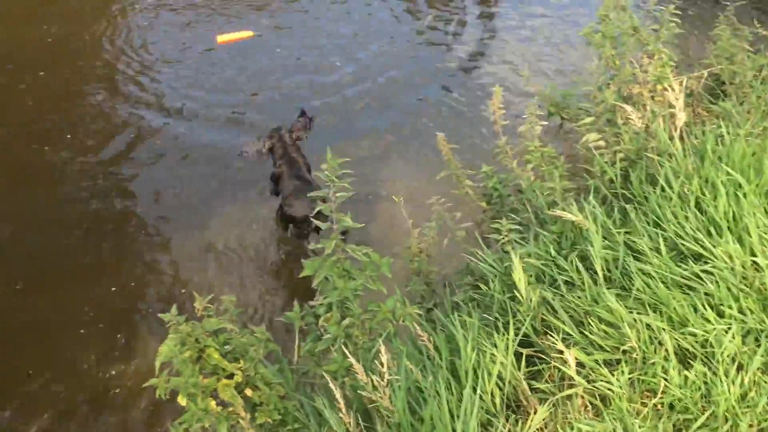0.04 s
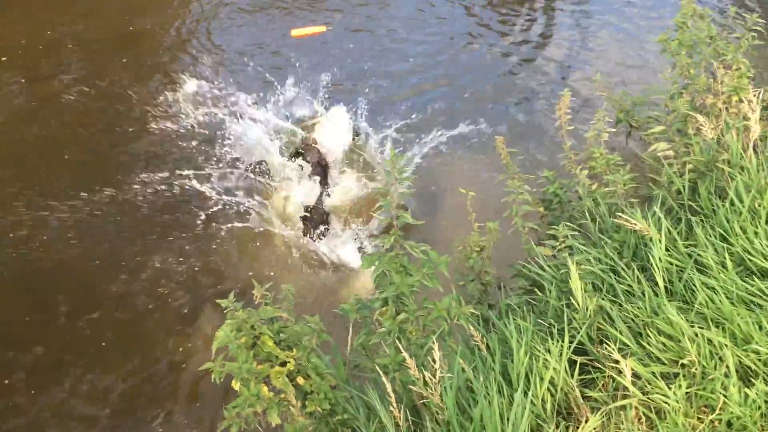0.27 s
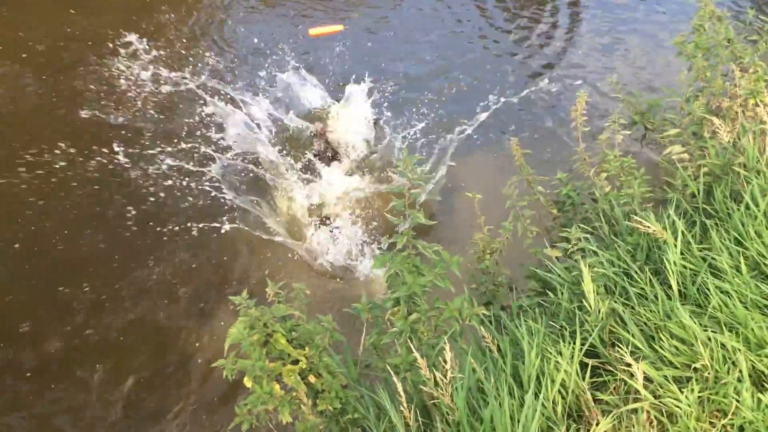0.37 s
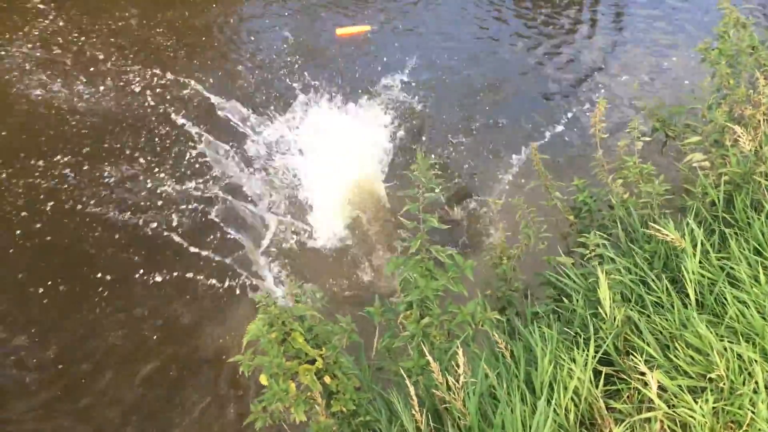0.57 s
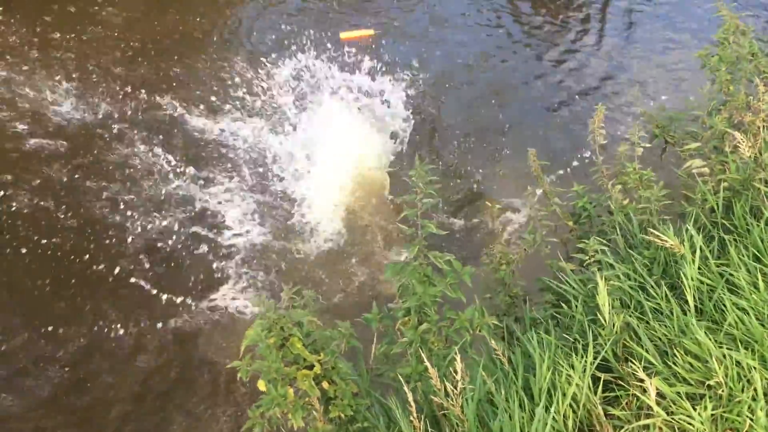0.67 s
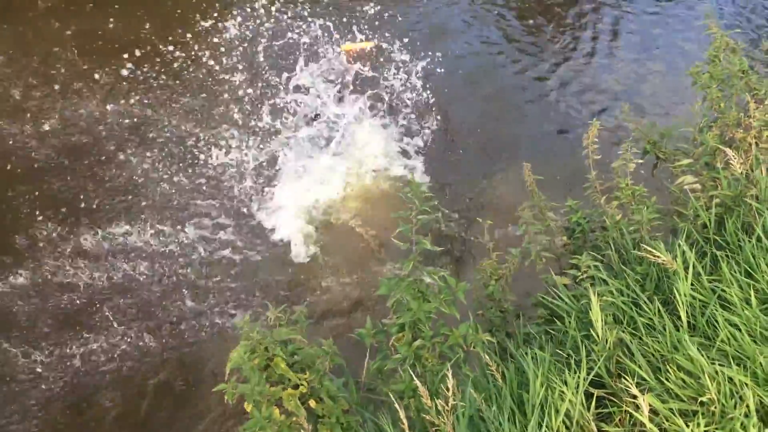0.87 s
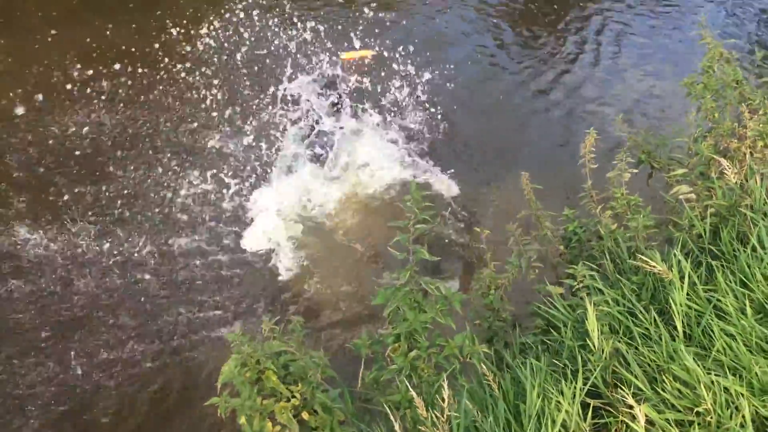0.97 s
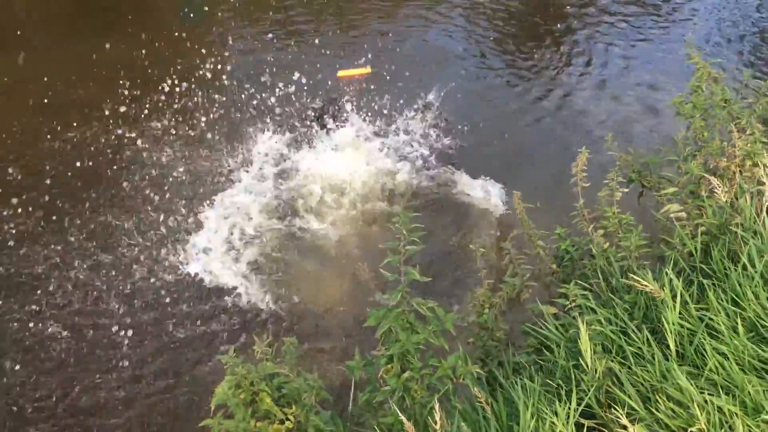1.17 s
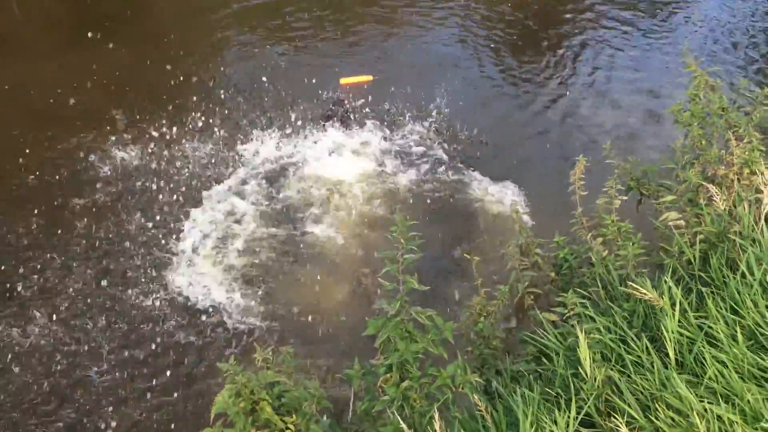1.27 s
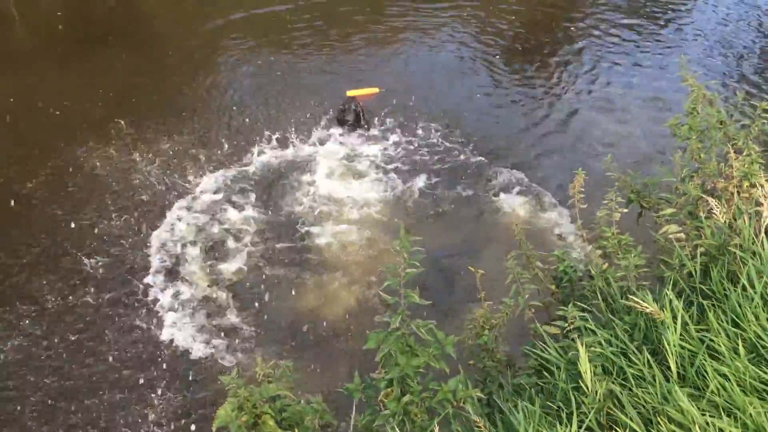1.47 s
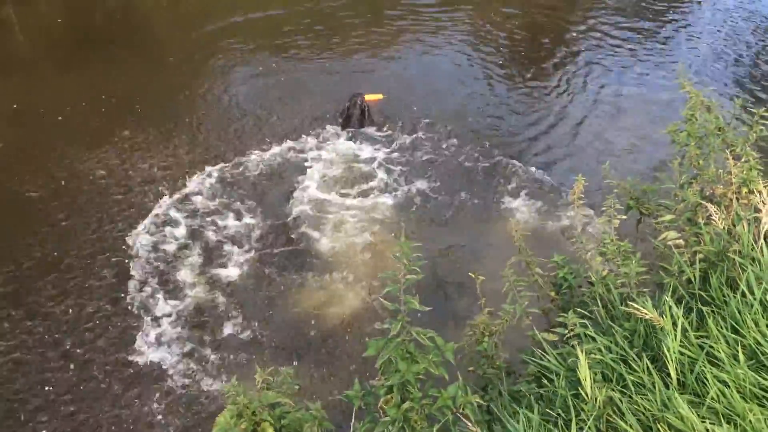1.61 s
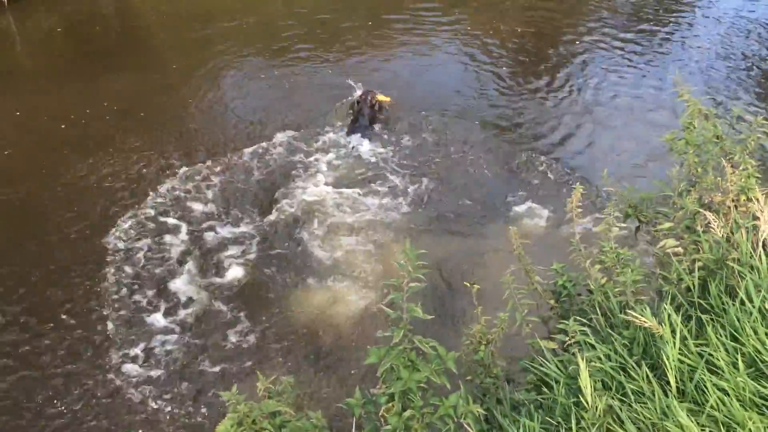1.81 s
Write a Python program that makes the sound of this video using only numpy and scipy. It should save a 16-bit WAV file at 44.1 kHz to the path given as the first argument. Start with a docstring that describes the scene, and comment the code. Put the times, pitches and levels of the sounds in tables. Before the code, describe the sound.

A dog plunges into water with a sudden splash, followed by pattering spray and drips.

```python
"""On a grassy river bank, one microphone a few metres from where a dog leaps into the water.
Paws and belly slap the surface and trap pockets of air that ring; the hollow closes with a thud and
throws up a jet. Spray rains back, the jet collapses into churning foam, and a few last fat drops land.
The banks scatter a little of the splash, and a faint outdoor hush and rumble lie under it all."""
import sys
import numpy as np
from scipy import signal
from scipy.fft import rfft, irfft
from scipy.io import wavfile

SR = 44100
rng = np.random.default_rng(int(sys.argv[2]) if len(sys.argv) > 2 else 0)


def put_to_file(sound):
    """Save the sound as 16-bit audio at rate SR, in the file named by the first command-line argument."""
    columns = np.atleast_2d(sound).T  # one column per channel
    safe = np.clip(columns, -1, 1)
    whole_steps = np.round(safe * 32767)
    wavfile.write(sys.argv[1], SR, whole_steps.astype(np.int16))


N = 81585
TIME = np.arange(N) / SR
CUTOFF_HZ = 15250
DECAYS_PER_T60 = np.log(1000)  # time constants in a fall of 60 dB


def from_db(db):
    return 10 ** (np.asarray(db) / 20)


def unit_rms(x):
    return x / np.sqrt(np.mean(x ** 2) + 1e-20)


def gain_over_time(curve):
    """Join (seconds, dB) points into a gain for every sample."""
    return from_db(np.interp(TIME, *np.transpose(curve)))


def gain_at_hz(colour, hz):
    """Read a gain from (Hz, dB) points on a log-frequency axis."""
    freqs, db = np.transpose(colour)
    return from_db(np.interp(np.log(hz), np.log(freqs), db))


def band(x, low_hz, high_hz, order=2):
    """Causal band-pass."""
    high_hz = min(high_hz, .45 * SR)
    sos = signal.butter(order, [min(low_hz, high_hz - 1), high_hz], "band", fs=SR, output="sos")
    return signal.sosfilt(sos, x + 1e-18)


def burst(start, attack_s, decay_s):
    """Quick rise and exponential fall."""
    age = np.maximum(TIME - start, 0)
    return (1 - np.exp(-age / attack_s)) * np.exp(-age / decay_s)


def noise(colour):
    """Smooth noise of a given colour, silent below its first point; rms 1."""
    hz = np.arange(1, N + 2) * SR / (2 * N)
    spectrum = rfft(rng.standard_normal(2 * N)) * gain_at_hz(colour, hz) * (hz > colour[0][0])
    return unit_rms(irfft(spectrum)[:N])


def clicks(per_s, spread_db):
    """Random clicks of uneven size, with steady mean power whatever their rate."""
    sizes = from_db(spread_db * np.minimum(rng.exponential(1, N), 4))
    signs = rng.choice([-1, 1], N)
    return sizes * signs * (rng.random(N) < per_s / SR) / np.sqrt(per_s)


def ring(x, hz, t60):
    """One bubble resonance, falling 60 dB in t60 seconds."""
    radius = from_db(-60 / (t60 * SR))
    angle = 2 * np.pi * hz / SR
    return signal.lfilter([1, 0, -1], [1, -2 * radius * np.cos(angle), radius ** 2], x + 1e-18)


def bubbles(colour, per_s, cycles, spread_db, count=28):
    """A cloud of bubbles at `count` pitches, each dying by 60 dB over `cycles` periods; rms 1."""
    low, high = colour[0][0], min(colour[-1][0], CUTOFF_HZ)
    pitches = low * (high / low) ** ((np.arange(count) + rng.random(count)) / count)
    cloud = np.zeros(N)
    for hz in pitches:
        ringing = ring(clicks(per_s / count, spread_db), hz, t60=cycles / hz)
        cloud += gain_at_hz(colour, hz) * np.sqrt(hz) * unit_rms(ringing)
    return unit_rms(band(cloud, low, high))


# A few metres out, the water is struck by paws, belly, the closing hollow and falling sheets.
# Each row: start in seconds, level in dB, decay in seconds, low and high band edges in Hz.
SLAPS = [(0.1992, -19.5, 0.0022, 1170, 2200), (0.202, -22.5, 0.0027, 1060, 7500),
         (0.2314, -17.5, 0.011, 400, 4000), (0.2348, -16, 0.0018, 900, 11200),
         (0.2463, -19.5, 0.0077, 403, 6000), (0.2525, -21.5, 0.0036, 450, 7900),
         (0.518, -33.5, 0.036, 150, 4000), (.547, -23.5, 0.022, 130, 7000), (0.936, -35, 0.025, 617, 1170),
         (1.082, -25, 0.0024, 1190, 1530), (1.107, -33.5, 0.058, 200, 1900),
         (1.2612, -26.5, 0.0034, 755, 1290)]


def slaps():
    """Each blow on the surface is a short, dense crackle."""
    out = np.zeros(N)
    for start, db, decay_s, low_hz, high_hz in SLAPS:
        envelope = burst(start, attack_s=0.00058, decay_s=decay_s)
        crackle = band(clicks(per_s=22000, spread_db=0.4), low_hz, high_hz, order=1)
        crackle = band(crackle, 0.43 * low_hz, CUTOFF_HZ, order=3)  # steep fall well below the band
        out += from_db(db) * envelope / envelope.max() * unit_rms(crackle)
    return out


# Large pockets of air under the splash.
# Each row: start in seconds, pitch in Hz, level in dB, seconds to fall 60 dB.
AIR_POCKETS = [(0.222, 426, -25.5, 0.043), (.231, 200, -16, 0.044), (0.2515, 238.5, -7, 0.066),
               (.291, 414, -26, 0.044), (0.294, 210.4, -20.5, 0.12), (.316, 570, -25, 0.029),
               (.354, 384, -24, 0.1), (.356, 220, -21.5, 0.1), (0.403, 150, -34, 0.058),
               (0.514, 139, -16.5, 0.049), (0.514, 418, -22, 0.09), (0.5441, 91, -14, 0.041),
               (.546, 290, -11.5, 0.014), (.596, 487, -28, 0.19), (.622, 398, -28.5, 0.09),
               (0.674, 385, -18, 0.037), (0.699, 333, -29, 0.082), (.745, 354, -34.5, 0.21),
               (0.791, 423, -37.5, 0.19), (.825, 358, -31, 0.066), (.917, 385, -25, 0.067),
               (.953, 363, -28.5, 0.08), (1.073, 416, -30.5, 0.076), (1.104, 130, -25.5, 0.1),
               (1.108, 360, -26, 0.072), (1.258, 780, -17.5, 0.02)]


def air_pockets():
    """Trapped air rings briefly, rising in pitch as it nears the surface."""
    rise_per_s = 0.92  # share of the starting pitch
    out = np.zeros(N)
    for start, hz, db, t60 in AIR_POCKETS:
        age = np.maximum(TIME - start, 0)
        phase = 2 * np.pi * hz * (age + rise_per_s * age ** 2 / 2)
        out += from_db(db) * burst(start, attack_s=0.00083, decay_s=t60 / DECAYS_PER_T60) * np.sin(phase)
    return out


# Spray landing on the river. Each row: time in seconds, level in dB.
SPRAY_LEVEL = [(.197, -89), (.203, -28.5), (.228, -34.5), (.245, -32), (.275, -31.5), (.34, -39),
               (.42, -40.5), (.48, -34), (.505, -34), (.56, -29.5), (.61, -35), (.72, -34), (.84, -32),
               (.96, -32), (1.08, -35), (1.22, -28), (1.26, -30), (1.325, -29.5), (1.36, -34.5),
               (1.46, -34.5), (1.55, -35), (1.575, -39.5), (1.68, -42.5), (1.78, -48), (1.85, -45.5)]
# The colours of its patter and its tinkle. Each row: frequency in Hz, relative density in dB.
SPRAY_COLOUR = [(700, 0), (1500, -7.5), (2200, -7), (3200, -3), (5000, -4.5), (8000, -7.5), (12500, -10.5),
                (15000, -18)]
TINKLE_COLOUR = [(1200, -2), (1550, 8.5), (2050, -40), (2400, 4), (3200, 1.5), (4400, -1.5), (6500, -12)]


def spray():
    """Droplets patter over a fine mist, thinning as the spray weakens; some trap a bubble that tinkles."""
    flow = gain_over_time(SPRAY_LEVEL)
    droplets_per_s = 11000 * np.maximum(flow / flow.max(), .1) ** 0.88
    patter = bubbles(SPRAY_COLOUR, droplets_per_s, cycles=5.7, spread_db=1, count=44)
    tinkle = from_db(-8.5) * bubbles(TINKLE_COLOUR, per_s=750, cycles=67, spread_db=1.6, count=40)
    mist = from_db(-5.5) * noise(SPRAY_COLOUR)
    return flow * (patter + mist + tinkle)


# Foam and gurgling in the water round the dog. Each row: time in seconds, level in dB.
FOAM_LEVEL = [(.197, -62), (.21, -55), (.226, -35.5), (.245, -26), (.28, -31), (.41, -38.5), (.48, -36),
              (.51, -35), (.56, -30.5), (.61, -36), (.8, -36.5), (.9, -42.5), (.955, -33.5), (1.04, -46),
              (1.12, -32), (1.23, -34), (1.35, -67.5), (1.47, -43), (1.66, -47.5), (1.85, -50.5)]
GURGLE_LEVEL = [(.212, -71), (.232, -29), (.26, -42), (.33, -31), (.43, -39.5), (.5, -35), (.54, -27.5),
                (.59, -37), (.73, -49.5), (.88, -46), (.95, -36.5), (1.04, -48.5), (1.13, -37),
                (1.23, -38.5), (1.32, -45), (1.47, -45.5), (1.85, -56.5)]
# Their colours. Each row: frequency in Hz, relative density in dB.
FOAM_COLOUR = [(400, 12), (650, -5.5), (950, 3.5), (1500, 2), (1850, 7), (2100, -32.5), (3000, 5)]
GURGLE_COLOUR = [(100, 5.5), (150, -15.5), (200, 2.5), (290, -3.5), (400, 2), (520, -13), (700, 4.5)]


def churn():
    """Small bubbles fizz in the foam while larger ones gurgle lower down."""
    foam = bubbles(FOAM_COLOUR, per_s=2500, cycles=14.3, spread_db=1.5)
    gurgle = bubbles(GURGLE_COLOUR, per_s=900, cycles=16, spread_db=2.5)
    return gain_over_time(FOAM_LEVEL) * foam + gain_over_time(GURGLE_LEVEL) * gurgle


# Single fat drops landing near the bank.
# Each row: start in seconds, level in dB, ring pitch in Hz, splat decay in seconds.
FAT_DROPS = [(1.262, -16.5, 1500, 0.0017), (1.297, -21, 1600, 0.0033), (1.348, -23, 1500, 0.0023),
             (1.373, -20, 7500, .002), (1.405, -33, 3620, 0.0034), (1.411, -19, 2680, 0.0043),
             (1.455, -16, 2660, 0.0049), (1.458, -21, 1880, 0.0034), (1.478, -18, 3200, 0.0032),
             (1.513, -21, 4420, 0.0033), (1.517, -15.5, 3900, 0.0014), (1.538, -12, 3730, 0.0018),
             (1.555, -26, 9000, 0.0024), (1.561, -21.5, 11000, 0.0033), (1.69, -22, 5470, 0.0023),
             (1.696, -20, 2930, 0.0025), (1.726, -13, 4620, 0.00092), (1.727, -23.5, 10000, 0.003),
             (1.736, -24, 7500, .002), (1.7684, -26, 2920, 0.0018), (1.779, -31, 7000, .002),
             (1.794, -28, 9800, .001), (1.8025, -28, 11000, .001)]


def fat_drops():
    """Each drop gives a noisy splat and a short ring around the same pitch."""
    ring_cycles = 15
    out = np.zeros(N)
    for start, db, hz, decay_s in FAT_DROPS:
        low_hz, high_hz, period_s = 0.63 * hz, 1.45 * hz, 1 / hz
        spatter = band(rng.standard_normal(N), low_hz, high_hz, order=1)
        splat = unit_rms(band(spatter, low_hz, CUTOFF_HZ)) * burst(start, period_s, decay_s)
        ring_decay_s = ring_cycles * period_s / DECAYS_PER_T60
        plink = np.sin(2 * np.pi * hz * (TIME - start)) * burst(start, period_s, ring_decay_s)
        out += from_db(db) * (from_db(-6) * splat + from_db(0.5) * plink)
    return out


# The finest droplets, last to reach the river. Each row: time in seconds, level in dB.
DRIZZLE_LEVEL = [(1.0, -79), (1.45, -45), (1.62, -46.5), (1.78, -42.5), (1.85, -50)]
# Their colour. Each row: frequency in Hz, relative density in dB.
DRIZZLE_COLOUR = [(5000, -14), (8500, -3), (11000, 2), (13000, 4)]


def drizzle():
    """Tiny droplets land with high ticks as the spray fades."""
    return gain_over_time(DRIZZLE_LEVEL) * bubbles(DRIZZLE_COLOUR, per_s=2300, cycles=31, spread_db=5)


def bank_scatter(water):
    """The river banks send a weak, short tail of the splash back to the microphone."""
    delay_s, t60 = 0.018, 0.27
    envelope = burst(delay_s, attack_s=delay_s, decay_s=t60 / DECAYS_PER_T60)
    tail = band(rng.standard_normal(N), low_hz=72, high_hz=4250, order=1) * envelope
    return from_db(-24) * signal.fftconvolve(water, tail / np.sqrt(np.sum(tail ** 2)))[:N]


# The open air around the microphone. Each row: frequency in Hz, relative density in dB.
HUSH_COLOUR = [(25, 31), (60, 3), (110, 3), (170, 2.5), (500, -7), (1050, 2), (1600, -12.5), (2500, -17),
               (6000, -18.5), (15000, -21)]
# The swell of that hush. Each row: time in seconds, relative level in dB.
HUSH_SWELL = [(0, 6), (.06, 0.5), (.14, 0.5), (.2, 1.5), (.8, 4), (1.85, 0.5)]
# The rumble beneath it. Each row: time in seconds, level in dB.
RUMBLE_LEVEL = [(0, -58.5), (.15, -72), (.3, -51), (.8, -55), (.9, -50), (1.3, -49), (1.85, -53)]


def background():
    """Faint open-air hush with a narrow low rumble."""
    rumble_hz, half_width_hz = 68.8, 4.4
    rumble = band(rng.standard_normal(2 * N), rumble_hz - half_width_hz, rumble_hz + half_width_hz)
    rumble = unit_rms(rumble[N:])  # the settled half
    hush = from_db(-46.5) * gain_over_time(HUSH_SWELL) * noise(HUSH_COLOUR)
    return hush + gain_over_time(RUMBLE_LEVEL) * rumble


def scene():
    """The splash, its scatter and the open air as they reach the bank, in mono."""
    water = slaps() + air_pockets() + fat_drops() + spray() + drizzle() + churn()
    return (water + bank_scatter(water) + background())[None]


def record(dry):
    """The microphone sheds the deepest bass and the highest treble; the top is cut steeply."""
    heard = band(dry, low_hz=54.3, high_hz=14800, order=3)
    return signal.sosfilt(signal.ellip(10, .2, 80, CUTOFF_HZ, fs=SR, output="sos"), heard)


dry = scene()
out = record(dry)
put_to_file(out)
```